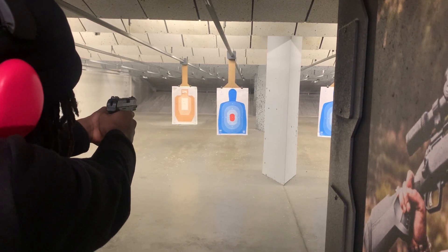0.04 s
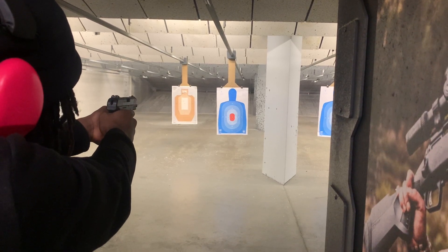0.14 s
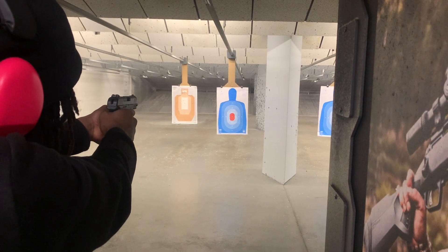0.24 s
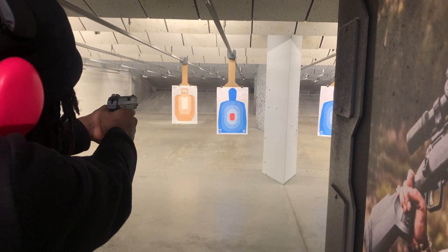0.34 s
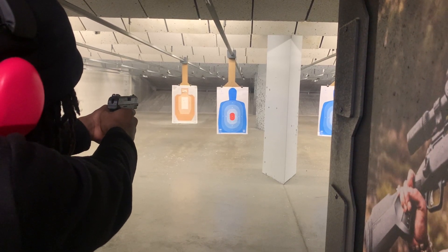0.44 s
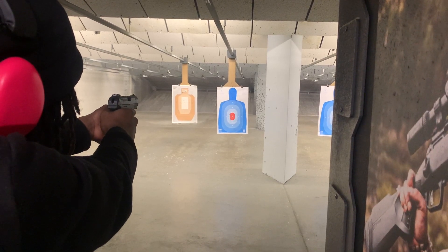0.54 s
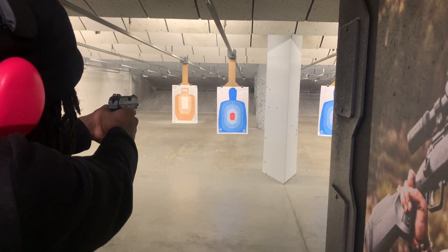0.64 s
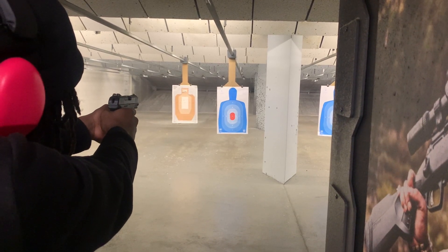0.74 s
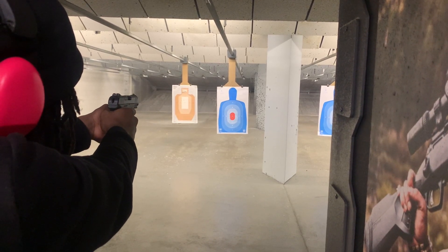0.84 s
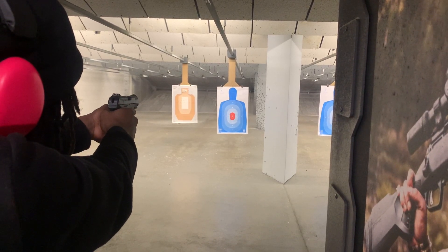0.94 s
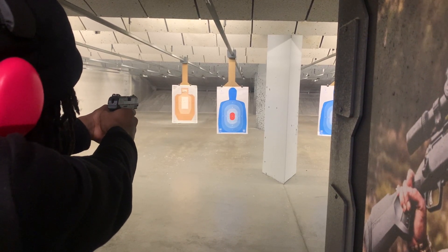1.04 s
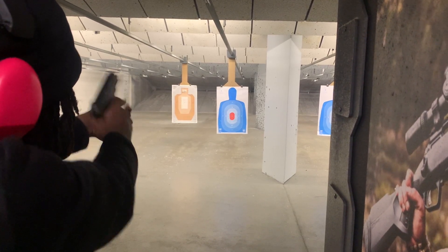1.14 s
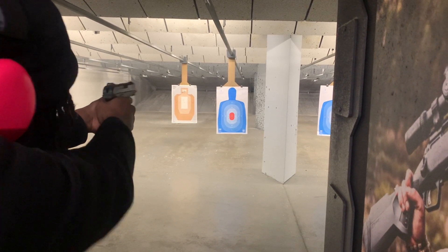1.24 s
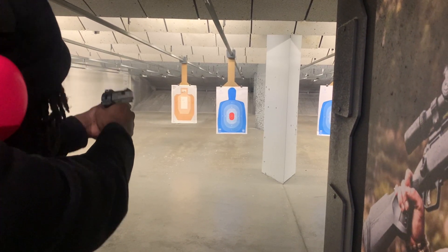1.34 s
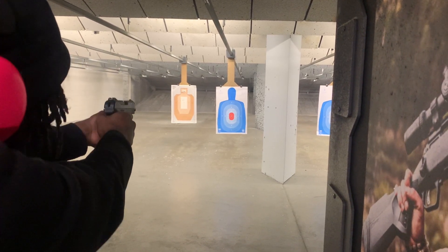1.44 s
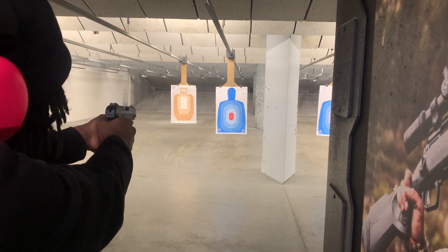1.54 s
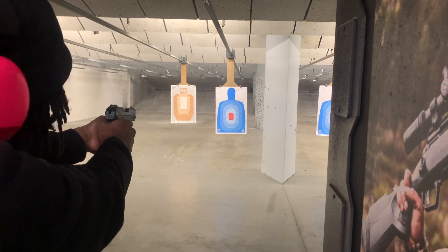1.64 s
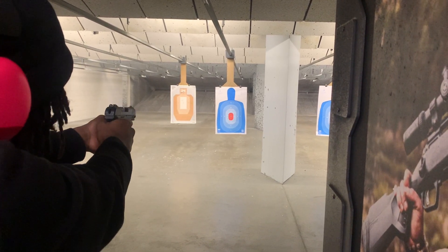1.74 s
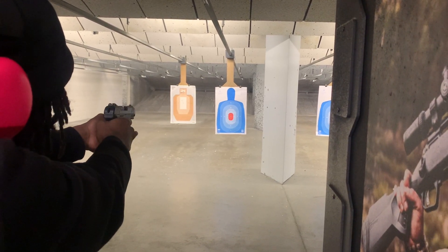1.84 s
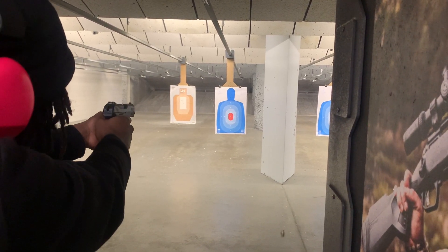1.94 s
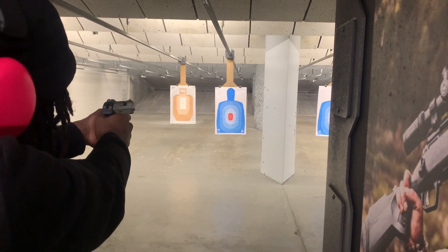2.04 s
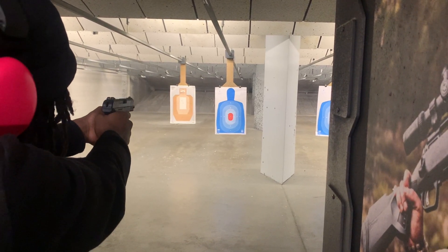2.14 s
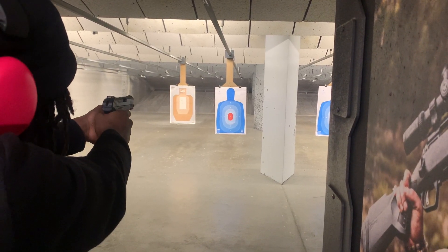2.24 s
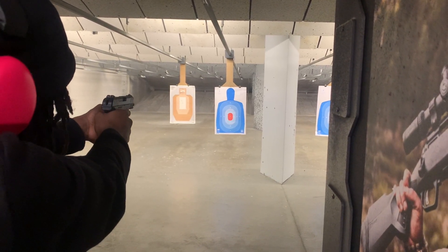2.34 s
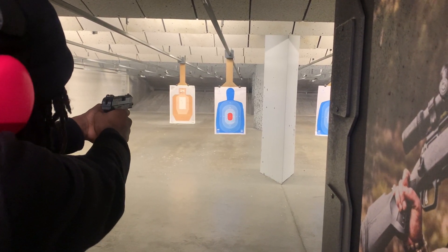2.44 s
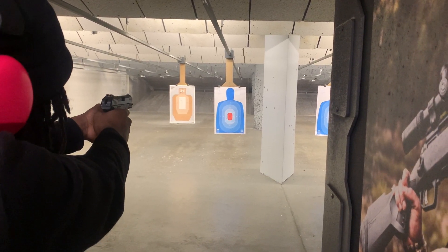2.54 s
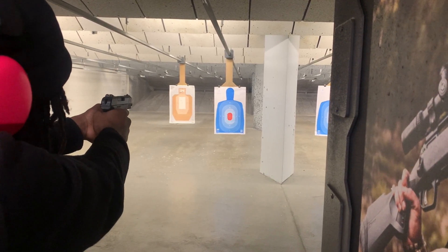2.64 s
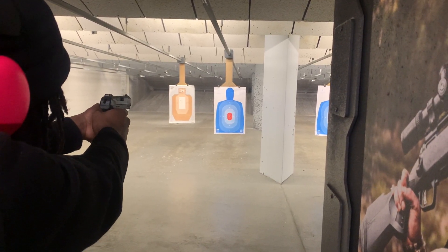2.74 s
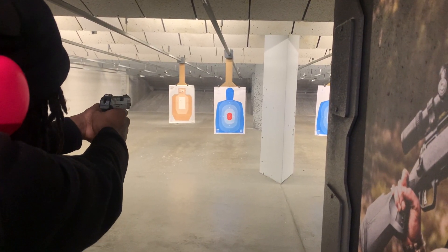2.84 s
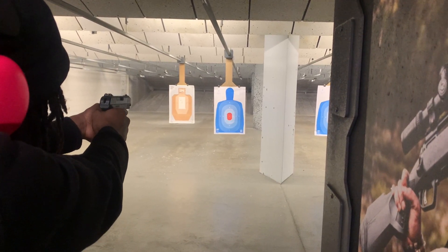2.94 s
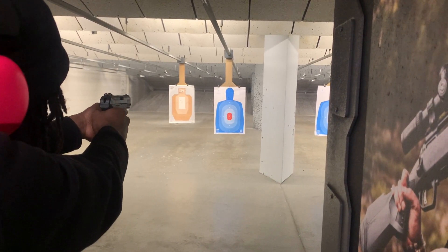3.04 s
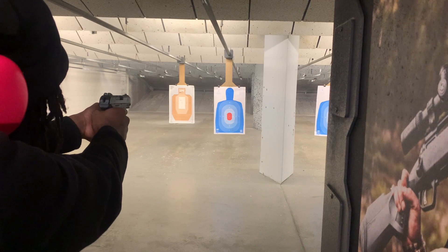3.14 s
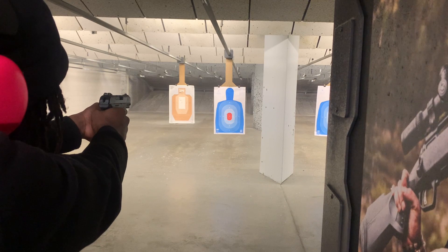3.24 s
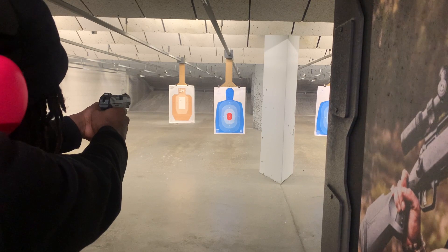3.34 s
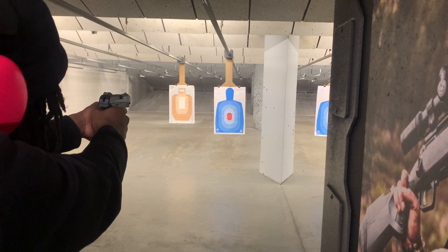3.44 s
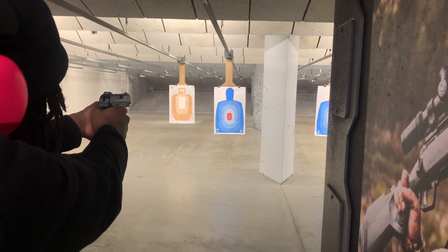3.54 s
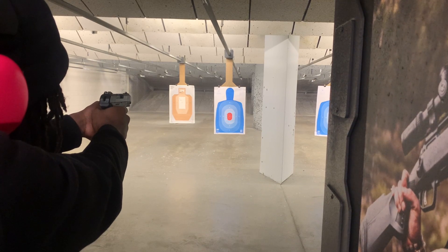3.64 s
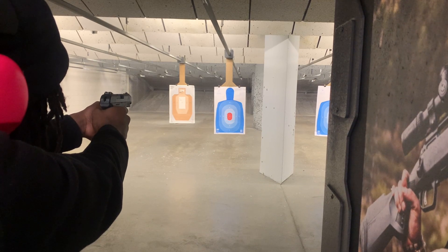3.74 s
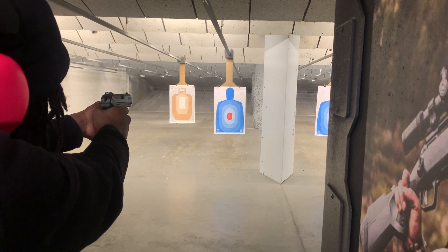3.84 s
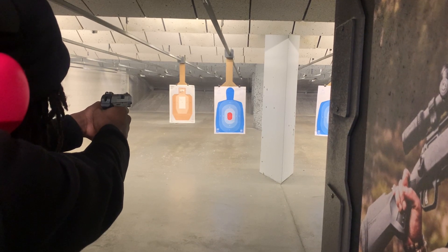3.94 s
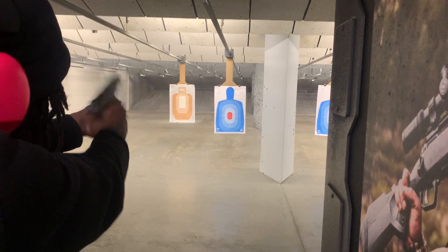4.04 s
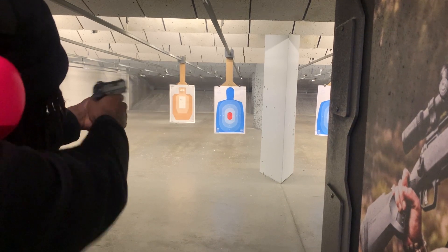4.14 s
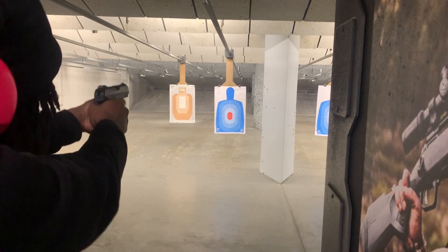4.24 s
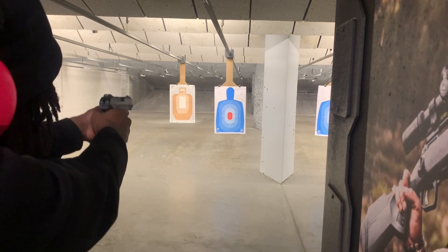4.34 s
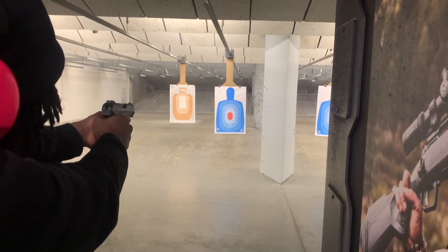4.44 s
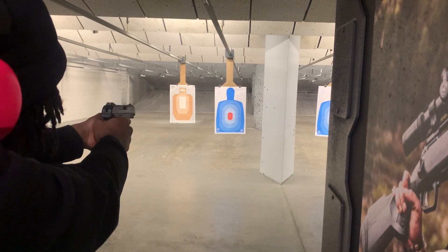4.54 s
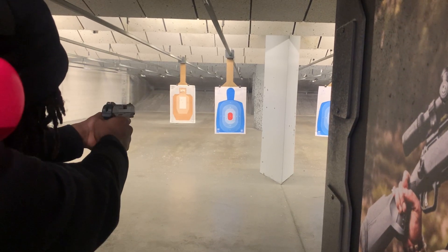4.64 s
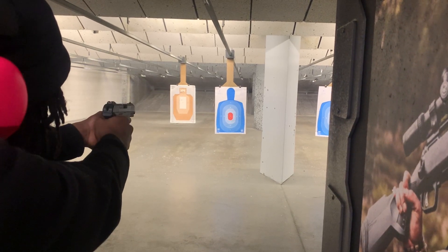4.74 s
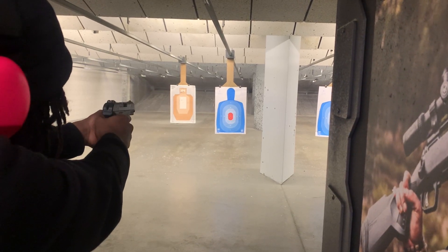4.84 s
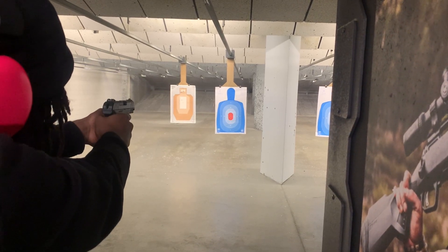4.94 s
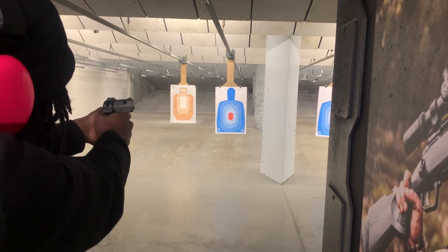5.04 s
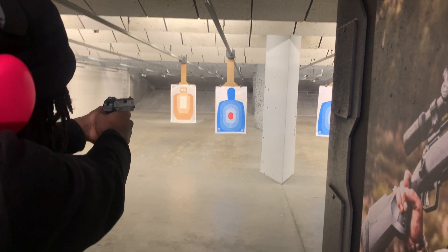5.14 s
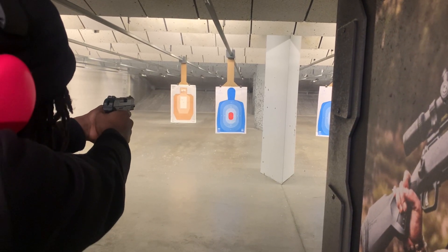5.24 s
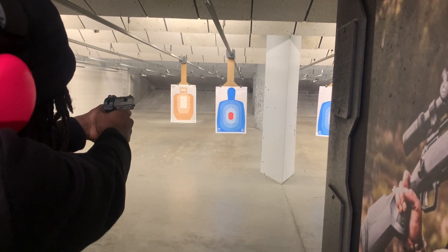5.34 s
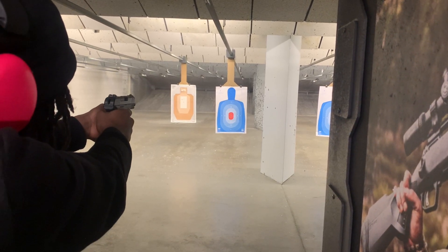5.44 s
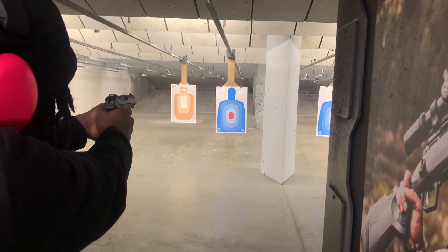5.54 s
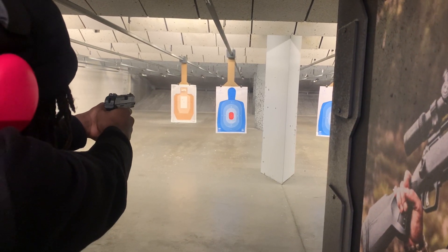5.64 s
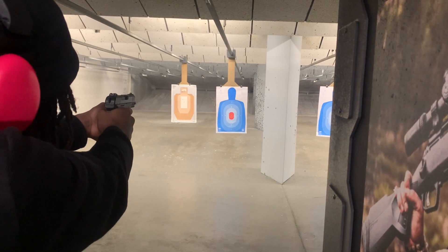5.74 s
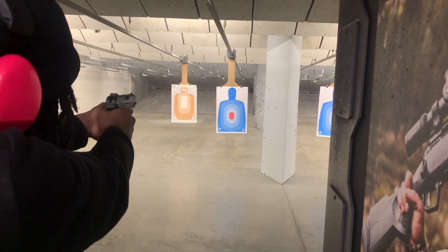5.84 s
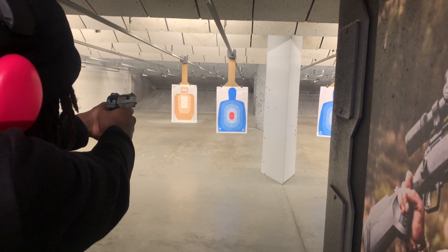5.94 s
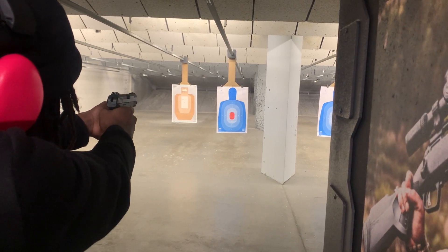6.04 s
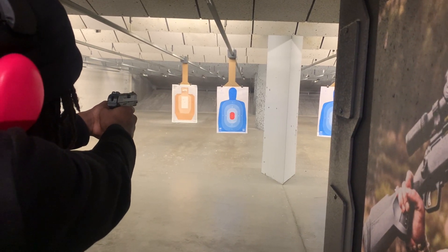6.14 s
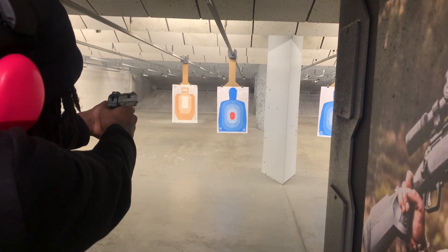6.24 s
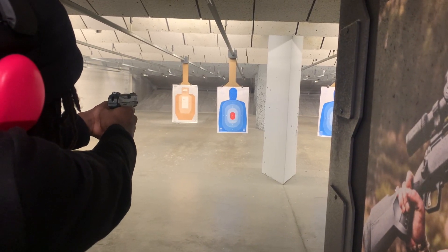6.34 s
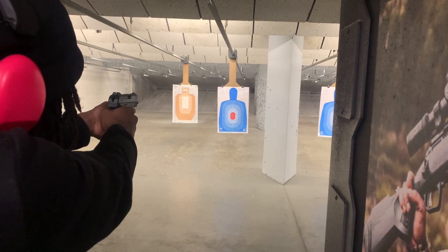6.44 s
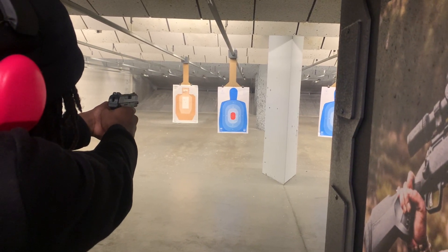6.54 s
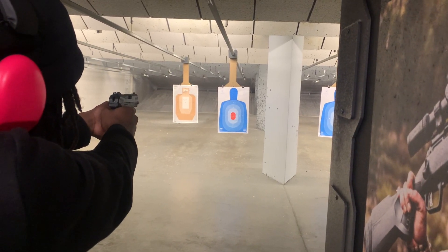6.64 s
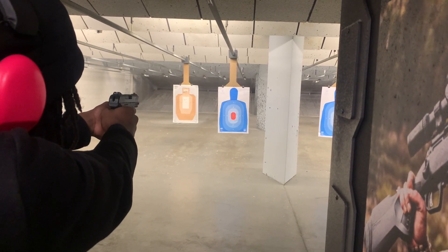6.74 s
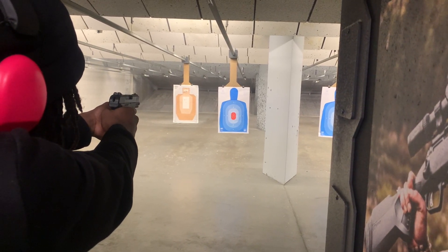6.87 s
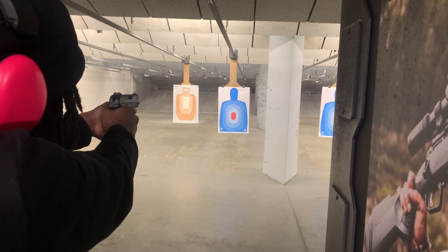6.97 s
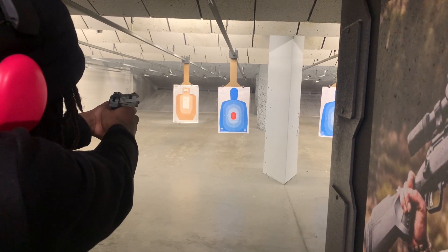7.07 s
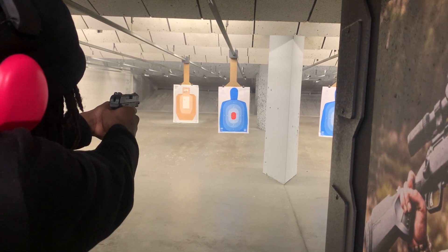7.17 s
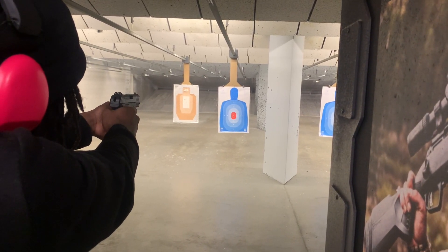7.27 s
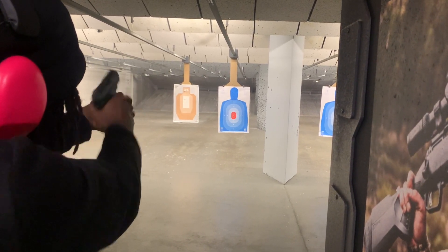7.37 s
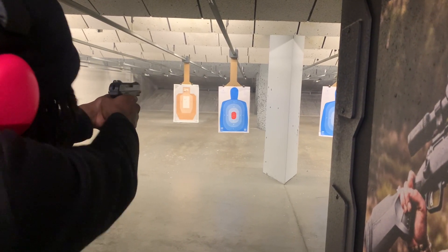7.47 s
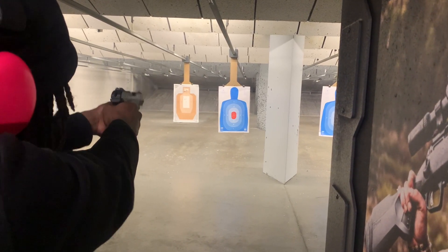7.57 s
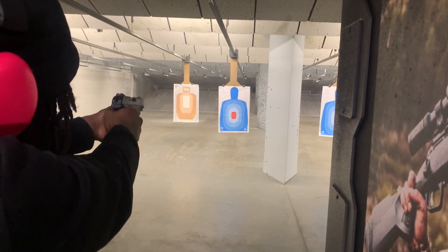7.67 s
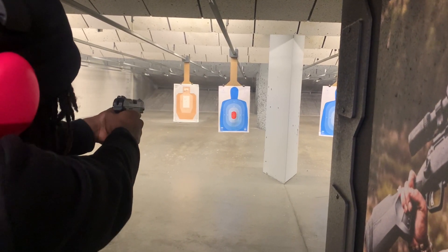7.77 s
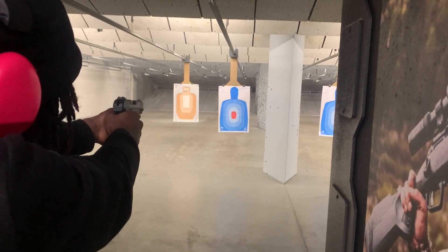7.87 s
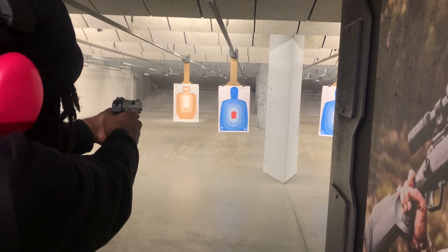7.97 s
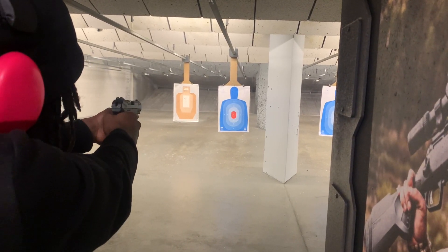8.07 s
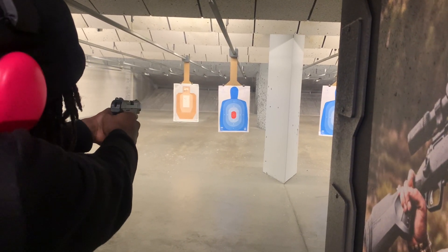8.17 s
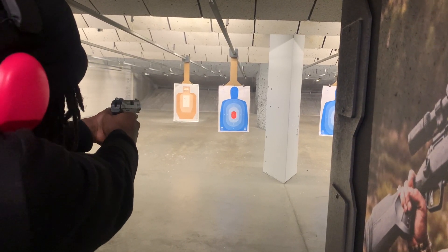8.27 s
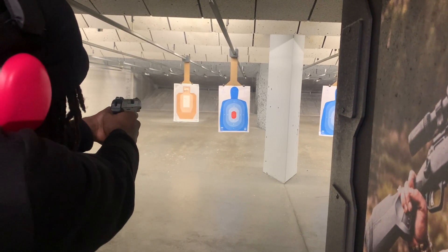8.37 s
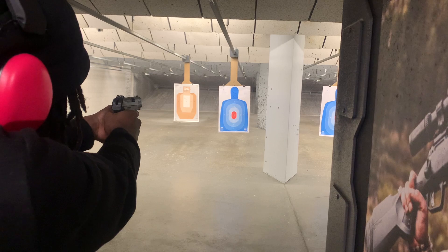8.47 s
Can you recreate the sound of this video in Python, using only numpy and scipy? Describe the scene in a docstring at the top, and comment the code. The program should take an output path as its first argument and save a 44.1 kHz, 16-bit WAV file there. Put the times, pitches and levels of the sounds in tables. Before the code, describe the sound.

Loud handgun reports alternate at irregular gaps, bouncing off a far wall into a long hall, while spent cases ring faintly on the floor.

```python
"""A concrete indoor range, where two pistols in neighbouring lanes fire in turn near a stereo microphone.
Each report is noise whose bands decay separately: a crack in the booth, then a far-wall return and the
long hall. Overhead steel rattles after it as bursts of decaying modes; spent brass cases tick and knock
as filtered noise, ring as paired sines and roll as narrow-band noise. Ventilation roar and fan tones
lie beneath."""
import sys
import numpy as np
from scipy import signal
from scipy.fft import rfft, irfft, next_fast_len
from scipy.io import wavfile
from scipy.ndimage import uniform_filter1d

SR = 44100
rng = np.random.default_rng(int(sys.argv[2]) if len(sys.argv) > 2 else 0)


def field_ratio(decibels):
    """Amplitude ratio for a level in dB (20 dB per decade); scalars and array-likes work."""
    return 10 ** (np.asarray(decibels, dtype=float) / 20)


def master(y):
    """Save y as 16-bit WAV."""
    cut = np.clip(np.atleast_2d(y).T, -1, 1)
    pcm = np.round(cut * 32767)  # scale
    wavfile.write(sys.argv[1], SR, pcm.astype(np.int16))


N = 375291  # length in samples

# Spectral levels are relative to white noise of unit variance; a shot's own level is added to them.
# reports: (t/s, level/dB, lane 0 or 1)
SHOTS = [(0.2906, 6, 0), (1.114, 5, 1), (2.8998, 6.5, 0), (4.034, 5, 1), (5.1255, 6, 0), (7.321, 5, 1),
         (7.888, 6, 0)]
# burst spectrum in the booth, one table a lane: (f/Hz, spectral level/dB)
BURST = [
    [(30, -36.5), (60, -18.5), (120, -14), (220, -7), (400, -2.5), (650, -5.5), (1000, -13), (1600, -17),
     (2500, -18), (4500, -22), (8000, -27.5), (12000, -29), (16000, -31.5)],
    [(30, -31), (60, -12), (120, -12.5), (220, -5), (400, -4.5), (650, -6.5), (1000, -11.5), (1600, -13.5),
     (2500, -18.5), (4500, -18.5), (8000, -24.5), (12000, -25.5), (16000, -31.5)],
]
# muzzle crack and sharp reflections, one list a lane:
# (t after the shot/s, level at 500 Hz/dB, at 3 kHz/dB, at 12 kHz/dB, t60 before the rise is allowed for/s)
ECHOES = [
    [(0, 5.5, 5.5, 1.5, 0.084), (.008, 5, -1.5, -6, 0.11), (.038, -3, -10.5, 2, 0.11)],
    [(0, -8, 7.5, 9.5, 0.12), (.025, 4.5, -11.5, -4.5, .15), (.048, -3, -14, -3, .1)],
]
# halo of noise heard just before and after the crack: (f/Hz, level re burst/dB, slope/(dB per s))
HALO = [(60, -7, 895), (400, -18, 1100.5), (2000, -12, 1298), (7500, -11, 1301.5), (9000, -53, 2997)]
# booth response: (f/Hz, rise time constant/s, t60/s)
BOOTH = [(60, 0.0037, 0.81), (250, 0.0052, 0.39), (700, 0.0055, 0.27), (2000, 0.0012, 0.33),
         (5000, 0.00084, 0.28), (14000, 0.00048, 0.34)]
# broad resonances, one table a lane: (f/Hz, width/Hz, level above the neighbours/dB)
BOOTH_RING = [
    [(201, 39, 7.5), (430, 150, -2), (1060, 530, 4.5), (2330, 140, 3.5)],
    [(610, 380, 5.5), (1100, 130, 5.5), (2350, 120, 5.5), (3320, 260, 3.5)],
]
HALL_RING = [
    [(99, 36, 3.1), (392, 210, 2.9), (630, 59, 3.8), (950, 48, 6.6), (2280, 530, 5.1), (4160, 480, 1.3)],
    [(92, 44, 5.5), (437.7, 260, 4.5), (950, 230, 3.1), (1660, 100, 2.2), (2390, 270, 4.6), (2700, 120, 6),
     (3700, 400, 2)],
]
# hall reverberation: (f/Hz, spectral level/dB, t60/s, level before the far wall answers/dB, at most 0)
HALL = [(30.34, -27.5, 0.55, 2), (60, -16.5, 1.8, 3.5), (99, -16.5, 1.8, -3), (210, -16.5, 1.57, -10.5),
        (397, -14.5, 1.067, -8.5), (650, -18, 1.305, -3.5), (977, -17.5, 1.214, -3.5),
        (1460, -24, 1.15, -14.5), (2650, -25.5, 1.02, -12.5), (4800, -24, 0.74, -11.5),
        (7800, -37.5, 0.77, -21), (12000, -40.5, 0.34, -26), (16000, -54, 0.26, -17)]
# travel time to the far wall and back, one a lane: (t/s)
FAR_WALL_S = [0.15, 0.15]
# far-wall return: (f/Hz, level re hall tail/dB, t60/s, time held before decay/s)
SLAP = [(300, -5, 0.29, 0.16), (1000, 4.5, 1, 0.13), (2510, -4, 1, 0.15), (5030, -5, 1, 0.01),
        (12000, 23.5, 0.29, 0.0051)]
# last, slow murmur of the building: (f/Hz, spectral level/dB, t60/s)
LINGER = [(30, -47, 2.5), (80, -30.5, 3.5), (200, -37.5, 2.9), (487, -43, 0.72), (1000, -38, 1.1),
          (1700, -53, 1.7), (2570, -53.5, 1.5), (4000, -70.5, 1.2), (8140, -88, .8)]
# modes of the overhead steel: (f/Hz, level in lane 0/dB, level in lane 1/dB, t60/s)
STEEL = [(2720, -69.5, -54.5, 0.09), (2360, -80.5, -57, .06), (3300, -65.5, -72, 0.098)]
# brass cases striking the floor: (t/s, ring level/dB, amplitude share of the upper mode 0-1,
# tick level before its decay/dB, knock level before its decay/dB)
CASES = [(0.8444, -69, .5, -92, -85), (0.9276, -82, .5, -57.5, -63), (1.554, -70, .2, -94, -68.5),
         (1.7576, -75, .3, -93, -81), (2.4336, -64, .5, -84, -62), (2.8424, -74, .3, -75, -71),
         (5.074, -64, .5, -47.5, -60), (5.5807, -61.5, .9, -77, -65), (5.8491, -69, 1, -94.5, -90),
         (5.9354, -59, 1, -74, -62.5), (6.306, -57, .2, -79, -77.5), (6.506, -54, .15, -73, -82),
         (6.7239, -62.5, 0.16, -77, -74)]
# close pair of modes of a case: (f/Hz, t60/s)
BRASS = [(11090, .27), (11390, 0.25)]
# tick spectrum: (f/Hz, relative level/dB)
TICK = [(3000, -39.5), (6500, -1), (10000, 1.5), (14000, 5.5), (16500, -12)]
# ventilation spectrum: (f/Hz, relative level/dB)
AIR = [(21, -29), (35, -1), (91, -1), (135, -15), (170, -3), (296, -25.5), (365, -4.5), (392, -11),
       (786, -11.5), (883, -19.5), (1940, -23.5), (3200, -31), (6000, -45), (9000, -60.5), (11700, -79.5),
       (19800, -120)]
# fan tones: (f/Hz, rms level before wavering/dB)
HUM = [(53.8, -76), (161.5, -72.5), (360.7, -77.5), (419.9, -78.5), (565.2, -80), (974.4, -80), (1970, -88)]
# likeness of the two ports: (f/Hz, share in common 0-1)
SAME = [(30, 0.6), (90, 0.8), (180, 0.98), (300, 0.46), (500, 0.92), (1000, 0.1), (2500, 0.074),
        (5000, 0.11), (7000, 0.43), (8500, 0.96), (10000, .95), (14000, 0.93), (16000, .7)]
# right port re left: (f/Hz, level/dB)
RIGHT = [(60, -1), (250, 0), (700, 1.95), (1400, 2), (2800, -0.15), (5600, -2.5), (9000, 0.5)]

LUMPS_DB, PATCH_DB = 1.1, 1.37  # rms of the clumping of reflections: all bands together, band by band
RIPPLE_DB, RIPPLE_HZ = 2, 30  # dense small resonances: rms and smoothing width
FRESH = 0.33  # amplitude of new noise in each report, beside its lane's fixed pattern
RATTLE_S, RATTLE_PER_S = 0.556, 22.8  # first knock after the shot, knock rate
RATTLE_PEAK_S, RATTLE_SPREAD_S = 0.76, 0.11  # strongest time after the shot, offset at which it is 6 dB down
KNOCK_HZ, KNOCK_WIDTH_HZ = 4900, 900  # the hollow of the case
ROLL_HZ, ROLL_DB, ROLL_T60_S = 11100, -19, 1.6  # band centre, level re the ring, fading
STIR_DB, STIR_SPREAD_DB = -93.5, 3.5  # older cases stirring; rms flutter of all rolling
AIR_DB, HISS_DB = -62, -118  # ventilation before its swell; microphone noise
LOW_LAG_S, HIGH_LAG_S, TURN_HZ = -0.00049, 0.000152, 5580  # right port's lateness below and above the turn
EDGE_HZ = 16100  # band limit


def evened(x):
    """Normalises to unit root-mean-square."""
    return x / np.sqrt(np.mean(x ** 2) + 1e-20)


def slow(shape, size):
    """Random modulation: noise low-passed by two moving averages along the last axis, unit rms."""
    once = uniform_filter1d(rng.standard_normal(shape), size=size)
    return evened(uniform_filter1d(once, size=size))


def read(points, hz, axis=1):
    """Interpolates one column of a table on a logarithmic frequency axis."""
    table = np.transpose(points)
    return np.interp(np.log(hz + 1), np.log(table[0] + 1), table[axis])


def add(mix, s, sound):
    """Superposes a two-channel sound on the mix from s seconds."""
    part = mix[:, round(s * SR):][:, :sound.shape[1]]
    part += sound[:, :part.shape[1]]


def dying(t, db, t60):
    """Exponential decay of power from t = 0, falling 60 dB in t60."""
    return (t >= 0) * field_ratio(db - 60 * np.maximum(t, 0) / t60) ** 2


def rising(t, rise):
    """Exponential approach to full power, from zero at t = 0."""
    return (1 - np.exp(-np.maximum(t, 0) / np.maximum(rise, 1e-4))) ** 2


def ports(noise):
    """Partial coherence: spectra of two noises at spaced microphone ports, partly alike and delayed."""
    hz = np.fft.rfftfreq(noise.shape[1], 1 / SR)
    left, other = rfft(noise)
    same = np.clip(read(SAME, hz), 0, 1)
    low_cycles = LOW_LAG_S * np.maximum(hz - 250, 0)  # deep bass arrives together
    late = np.exp(-2j * np.pi * np.where(hz < TURN_HZ, low_cycles, HIGH_LAG_S * hz))
    right = field_ratio(read(RIGHT, hz)) * (same * left * late + np.sqrt(1 - same ** 2) * other)
    return hz, np.array([left, right])


def shaped(noise, colour, rings, shapes, centres):
    """Subband synthesis: coloured noise is split into overlapping bands, each with its own envelope."""
    hz, z = ports(noise)
    resonance_db = sum(db / (1 + (2 * (hz - f) / width) ** 2) for f, width, db in rings)
    z = z * field_ratio(read(colour, hz) + resonance_db)
    place = np.interp(np.log(hz + 1), np.log(centres), np.arange(len(centres)))
    out = 0
    for k, shape in enumerate(shapes):
        weight = np.maximum(1 - np.abs(place - k), 0)
        out = out + irfft(z * weight) * shape
    return out


def shots():
    """Impulse response: each lane has a dense pattern of reflections, nearly the same at every shot."""
    out, centres = np.zeros((2, N)), np.geomspace(30, 16000, num=16)
    lead = 2048 / SR  # room for the halo of noise ahead of the crack
    stages = ((booth, BURST, BOOTH_RING, 2 ** 15, -lead), (hall, [HALL, HALL], HALL_RING, 2 ** 17, 0))
    for rule, colours, rings, size, start in stages:
        t = start + np.arange(size) / SR
        ripple = slow((2, 1, size // 2 + 1), size=max(round(RIPPLE_HZ * size / SR), 1))
        lanes = irfft(rfft(rng.standard_normal((2, 2, size))) * field_ratio(RIPPLE_DB * ripple))
        lanes = evened(lanes) * field_ratio(LUMPS_DB * slow((2, 1, size), size=300))  # reflections arrive in clumps
        patches = field_ratio(PATCH_DB * slow((2, len(centres), size // 16), size=60))
        coarse = t[::16]
        shapes = [[np.interp(t, coarse, rule(lane, hz, coarse) * patch)
                   for hz, patch in zip(centres, patches[lane])] for lane in (0, 1)]
        for s, db, lane in SHOTS:
            lane = round(lane)
            noise = lanes[lane] + FRESH * rng.standard_normal((2, size))
            report = shaped(noise, colours[lane], rings[lane], shapes[lane], centres)
            add(out, s + start, field_ratio(db) * report)
    return out


def booth(lane, hz, t):
    """Addition of powers in one band: booth burst and sharp returns, plus a halo of noise around the crack."""
    rise = read(BOOTH, hz)
    power = dying(t, 0, read(BOOTH, hz, axis=2)) * rising(t, rise)
    for s, low_db, mid_db, high_db, t60 in ECHOES[lane]:
        db = read([(500, low_db), (3000, mid_db), (12000, high_db)], hz)
        power += dying(t - s, db, t60 + 3 * rise) * rising(t - s, rise)
    halo_db = read(HALO, hz) - read(HALO, hz, axis=2) * np.abs(t)
    return np.sqrt(power + field_ratio(halo_db) ** 2)


def hall(lane, hz, t):
    """Reverberation: amplitude of one band, which opens when the far wall answers, then murmurs."""
    back = t - FAR_WALL_S[lane]
    early = np.clip(field_ratio(read(HALL, hz, axis=3)), 0, 1) ** 2
    held = np.maximum(back - read(SLAP, hz, axis=3), 0)
    slap = dying(held, read(SLAP, hz), read(SLAP, hz, axis=2))
    opened = early + rising(back, 2.6 * read(BOOTH, hz) + 0.0012) * (1 - early + slap)
    tail = dying(t, 0, read(HALL, hz, axis=2)) * opened
    murmur = dying(t, read(LINGER, hz) - read(HALL, hz), read(LINGER, hz, axis=2))
    return np.sqrt((tail + murmur) * rising(t, 0.005))


def rattle():
    """Repeated modal excitation: a swinging steel part knocks regularly for a moment after each shot."""
    out, t = np.zeros((2, N)), np.arange(4096) / SR
    after = RATTLE_S + np.arange(9) / RATTLE_PER_S
    swing_db = -6 * ((after - RATTLE_PEAK_S) / RATTLE_SPREAD_S) ** 2
    for s, _, lane in SHOTS:
        knocks_db = swing_db + 2.2 * rng.standard_normal(len(after))
        for late, db in zip(after, knocks_db):
            # loose parts blur the pitch
            buzz = evened(uniform_filter1d(rng.standard_normal((2, len(t))), size=150))
            modes = 0
            for f, *lane_db, t60 in STEEL:
                tone = np.sin(2 * np.pi * (f * t + rng.random((2, 1))))
                modes = modes + field_ratio(lane_db[round(lane)] - 60 * t / t60) * tone
            add(out, s + late, field_ratio(db) * modes * rising(t, 0.0018) * buzz)
    return out


def cases():
    """Impact and free vibration: a tick and hollow knock with a little room, then a fluttering thin ring."""
    out, t = np.zeros((2, N)), np.arange(16384) / SR
    late = t - np.array([[0], [HIGH_LAG_S]])
    strike = np.sqrt(dying(t, 3.5, 0.02) + dying(t, -15, 0.18))  # contact, then room
    for s, ring_db, upper, tick_db, knock_db in CASES:
        hz, z = ports(rng.standard_normal((2, len(t))))
        tick = field_ratio(tick_db) * evened(irfft(z * field_ratio(read(TICK, hz))))
        hollow = 1 / (1 + (2 * (hz - KNOCK_HZ) / KNOCK_WIDTH_HZ) ** 2)
        knock = field_ratio(knock_db) * evened(irfft(z * hollow))
        upper = np.clip(upper, 0, 1)
        ring = 0
        for share, (f, t60) in zip((1 - upper, upper), BRASS):
            phase = 2 * np.pi * (f * late + rng.random()) + 0.3 * slow(len(t), size=400)
            ring = ring + share * field_ratio(-60 * t / t60) * np.sin(phase)
        flutter_db = 1.5 * slow(len(t), size=500)
        ring = ring * field_ratio(ring_db + 3 + flutter_db) * rising(t, 0.00088)  # 3 dB from rms to peak
        add(out, s, (tick + knock) * strike + ring)
    return out


def rolling():
    """Sustained excitation: as a case rolls on, floor grit drives its ring in a narrow, fluttering band."""
    size, t = next_fast_len(N), np.arange(N) / SR
    hz, z = ports(rng.standard_normal((2, size)))
    band = 1 / (1 + ((hz - ROLL_HZ) / 70) ** 4)
    fuzz = evened(irfft(z * band, size)[:, :N])
    power = field_ratio(STIR_DB) ** 2
    for s, ring_db, *_ in CASES:
        power = power + dying(t - s, ring_db + ROLL_DB, ROLL_T60_S)
    return np.sqrt(power) * field_ratio(STIR_SPREAD_DB * slow(N, size=3000)) * fuzz


def ventilation():
    """Broadband flow noise and tones: duct roar that swells slowly, with wavering fan tones."""
    size, t = next_fast_len(N), np.arange(N) / SR
    hz, z = ports(rng.standard_normal((2, size)))
    uneven_db = 1.7 * slow(len(hz), size=120)
    roar = evened(irfft(z * field_ratio(read(AIR, hz) + uneven_db), size)[:, :N])
    swell = evened(sum(np.sin(2 * np.pi * (f * t + rng.random())) / np.sqrt(f)
                       for f in np.geomspace(0.2, 6, num=12)))
    out = field_ratio(AIR_DB + 0.6 * swell) * roar
    for f, db in HUM:
        waver = evened(uniform_filter1d(rng.standard_normal(N), size=3000))
        tone = np.sin(2 * np.pi * f * t + 3.0 * waver)
        # level wavers apart from phase: the same curve, one second later
        out += np.sqrt(2) * field_ratio(db) * tone * field_ratio(2.1 * np.roll(waver, SR))
    return out


def scene():
    """Superposition of all sources at the two ports."""
    return shots() + rattle() + cases() + rolling() + ventilation()


def roll_off(x):
    """The treble ends steeply here."""
    return signal.sosfilt(signal.butter(12, 16800, fs=SR, output="sos"), x)


def record(dry):
    """Transduction: microphone hiss, input saturation on the loudest peaks, band limit."""
    x = dry + field_ratio(HISS_DB) * rng.standard_normal(dry.shape)
    x = x / (1 + np.abs(x / 0.93) ** 4) ** 0.25
    low_pass = signal.firwin(255, EDGE_HZ, window=("kaiser", 8), fs=SR)
    x = signal.oaconvolve(x, low_pass[None], "same")
    return roll_off(x)


dry = scene()
out = record(dry)
master(out)
```